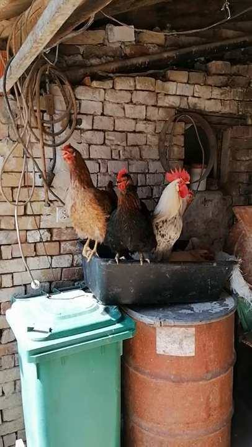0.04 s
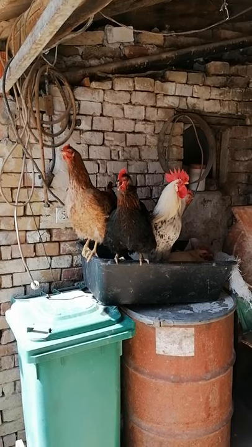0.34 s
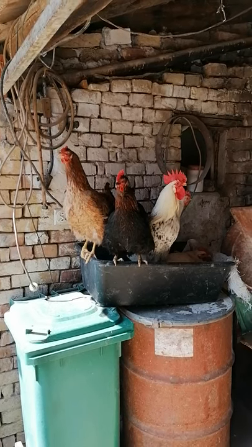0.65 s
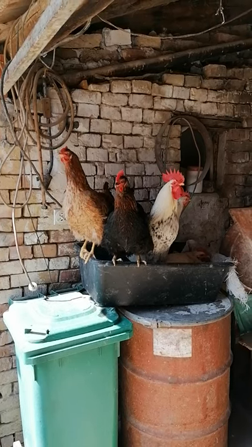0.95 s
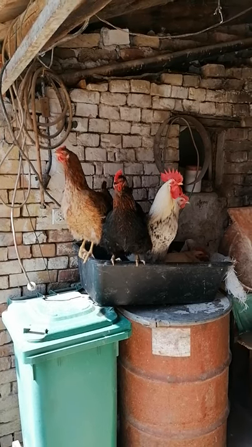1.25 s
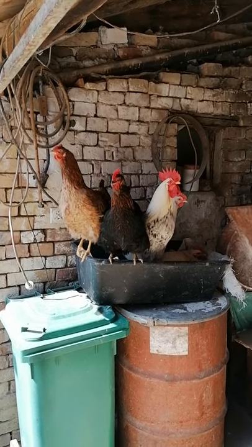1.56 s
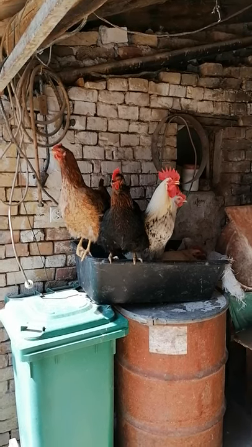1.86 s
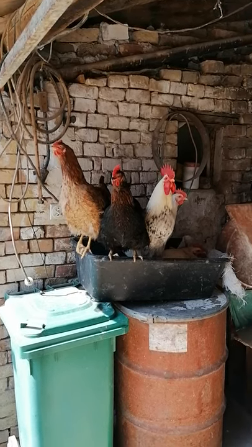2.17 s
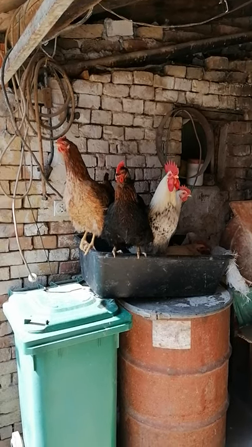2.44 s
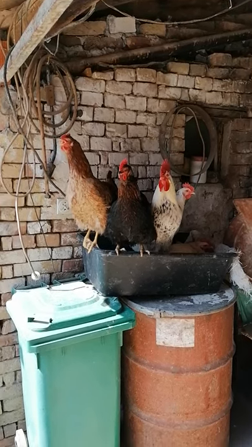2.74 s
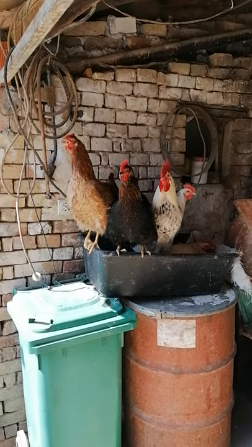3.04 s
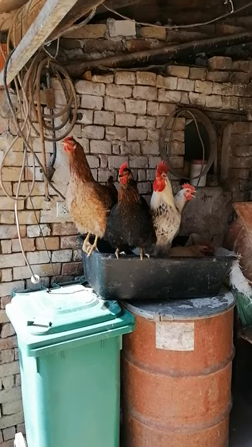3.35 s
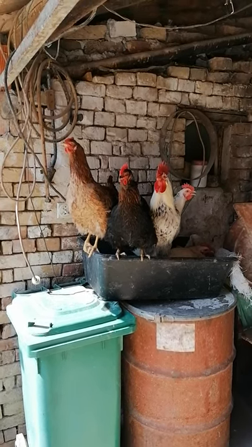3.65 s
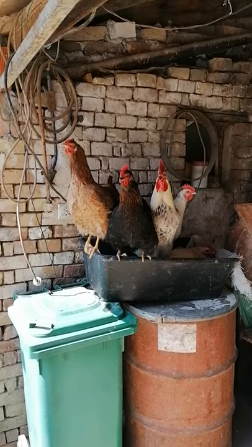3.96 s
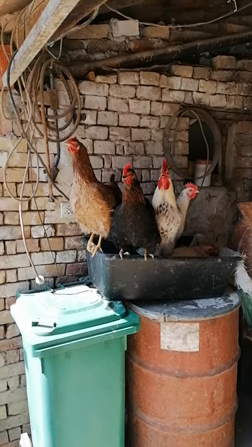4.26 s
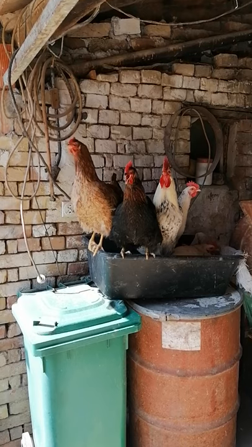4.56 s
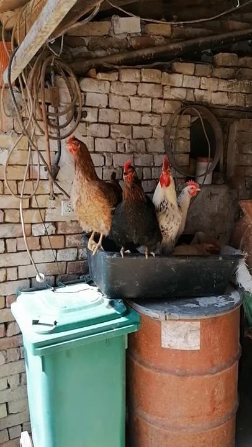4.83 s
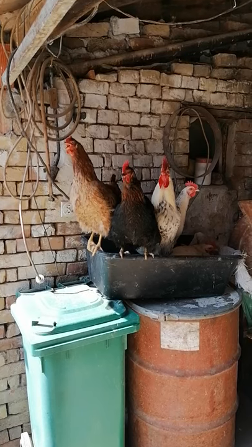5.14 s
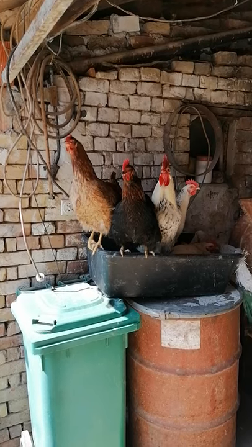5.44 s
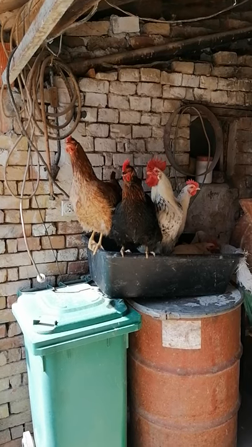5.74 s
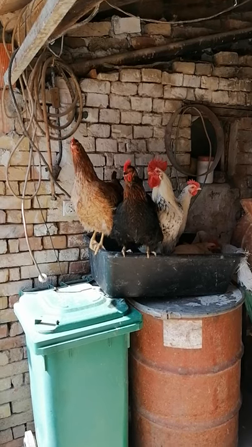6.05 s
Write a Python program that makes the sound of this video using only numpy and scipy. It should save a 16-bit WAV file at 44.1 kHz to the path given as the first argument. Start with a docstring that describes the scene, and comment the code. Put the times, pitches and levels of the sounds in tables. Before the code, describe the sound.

Several hens cackle in a brick shed, a few steps from the microphone. A shrill cry cracks, gruff clucks start up and a rasp falls away. More clucks and two soft moans lead to another cry, then two drawn-out squawks, one low and one higher. A last rasp and cry give way to clucks. The walls add a short echo over a faint yard rumble.

```python
"""Hens cackle on a tub in a brick shed, a few steps away. A shrill cry breaks, gruff clucks
start up and a rasp falls away. Clucks and two soft moans lead to another cry, then two harsh starts
clear into held tones, one low, one high. A last rasp and cry give way to clucks. Each call is a train
of syrinx pulses coloured by throat and beak; the walls answer with a short echo, over a faint yard rumble."""
import sys
import numpy as np
from scipy import signal
from scipy.fft import rfft, irfft
from scipy.io import wavfile
from scipy.ndimage import uniform_filter1d, map_coordinates

SR = 44100
rng = np.random.default_rng(int(sys.argv[2]) if len(sys.argv) > 2 else 0)


def materialize(psi):
    """Save the field psi as 16-bit PCM at rate SR to the path in sys.argv[1].

    A 1-D psi becomes a single channel; in a 2-D psi each row is a channel.
    """
    bounded = np.clip(np.atleast_2d(psi).T, -1, 1)
    quanta = np.round(bounded * 32767).astype(np.int16)
    wavfile.write(sys.argv[1], SR, quanta)


N = 269010
HZ = np.fft.rfftfreq(4096, 1 / SR)  # frequency grid of the tone curves


def amp(db):
    """Decibels to gain."""
    return 10 ** (np.asarray(db) / 20)


def evened(x):
    """Scales to rms 1."""
    return x / np.sqrt(np.mean(x ** 2) + 1e-20)


def steadied(x, size=1100):
    """Holds the short-time rms at 1."""
    return x / np.sqrt(abs(uniform_filter1d(x ** 2, size)) + 1e-12)


def ramp(t, start, length):
    """Rises from 0 to 1 over length, from start on."""
    return np.clip((t - start) / length, 0, 1)


def read(points, hz=HZ):
    """Reads a curve on a log-frequency axis."""
    f, value = np.transpose(points)
    return np.interp(np.log(hz + 1), np.log(f + 1), value)


def add(mix, s, sound):
    """Mixes a sound in at time s; what comes before time zero is dropped."""
    at = round(s * SR)
    sound = sound[max(-at, 0):]
    part = mix[max(at, 0):][:len(sound)]
    part += sound[:len(part)]


def coloured(x, db):
    """Minimum-phase EQ with the gain db on the HZ grid."""
    log_gain = np.log(amp(np.r_[db, db[-2:0:-1]]))
    taps = irfft(np.exp(np.conj(signal.hilbert(log_gain)))[:len(HZ)])
    return signal.fftconvolve(x, taps)[:len(x)]


def split(x, hz=1800):
    """Crossover into body and treble."""
    bands = [signal.butter(4, hz, kind, fs=SR, output="sos") for kind in ("low", "high")]
    return [signal.sosfilt(np.tile(sos, (2, 1)), x) for sos in bands]


def wander(n, hz):
    """Random drift of about rms 1, moving at rates up to about hz."""
    f = np.fft.rfftfreq(SR, 1 / SR)
    return evened(irfft(rfft(rng.standard_normal(SR)) / (1 + (f / hz) ** 4)))[:n]


def syrinx(hz, rough, doubling, jitter, shimmer, flutter, hiss=.5):
    """One pulse a cycle; roughness upsets pitch, timing and strength and lets puffs of air through."""
    n = len(hz)
    turns = np.cumsum(hz * (1 + flutter * rough * wander(n, 130) + .0016 * wander(n, 42))) / SR
    at = np.flatnonzero(np.diff(np.floor(turns)))
    late, strength = rng.standard_normal((len(at), 2)).T
    place = at + (np.ceil(turns[at]) - turns[at] + jitter * rough[at] * late) * SR / hz[at]
    # in period doubling every second pulse is weak
    size = np.exp(shimmer * rough[at] * strength) * (1 - doubling[at] * (np.arange(len(at)) % 2))
    near = np.floor(place).astype(int)[:, None] + np.arange(-7, 9)
    offset = near - place[:, None]
    shape = np.sinc(offset) * np.cos(np.pi * offset / 16) ** 2  # band-limited click
    pulses = np.bincount(np.clip(near, 0, n - 1).ravel(), (size[:, None] * shape).ravel(), n)
    puffs = np.exp(-(turns % 1) / .9) * rng.standard_normal(n)
    return evened(pulses - pulses.mean()) + hiss * rough * evened(puffs)


def closing_beak(drive, throat, sag, sag_s=.11, count=6):
    """The beak gapes at the start of a call and then closes, so all throat resonances slide down."""
    t = np.arange(len(drive)) / SR
    stages = np.linspace(0, t[-1], count)
    scales = 1 + sag * (np.exp(-stages / sag_s) - .4)
    return sum(np.interp(t, stages, share) * coloured(drive, read(throat, HZ / scale))
               for share, scale in zip(np.eye(count), scales))


def squawks(calls, throat, jitter, shimmer, flutter, sag, body_db, treble_db, rattle_db=4):
    """One hen's syrinx sounds through her throat, following each call's pitch, grit and level curves."""
    out = np.zeros(N)
    for start, hz, rough, doubling, effort_db, bright_db in calls:
        t = np.arange(len(hz)) / SR
        drive = syrinx(hz, np.clip(rough, 0, 1), np.clip(doubling, 0, 1), jitter, shimmer, flutter)
        body, treble = split(closing_beak(drive, throat, sag))
        voice = amp(body_db) * steadied(body) + amp(treble_db + bright_db) * steadied(treble)
        gate = ramp(t, 0, .006) * ramp(t[-1] - t, 0, .008)
        rattle = amp(rattle_db * rough * wander(len(t), 47))  # a rough voice also shakes in strength
        add(out, start, gate * rattle * amp(effort_db) * voice)
    return out


def bobbing(x, echo_db=-9, delay_s=.0021, sway_s=.00006, sway_hz=2.5):
    """The hen's head moves before a wall: the near echo shifts, and overtones swell and fade in turn."""
    at = np.arange(N)
    knots = np.arange(0, N + SR, SR / sway_hz)
    sway = uniform_filter1d(np.interp(at, knots, rng.standard_normal(len(knots))), size=8000)
    echo = map_coordinates(x, [at - (delay_s + sway_s * sway) * SR], order=3)
    return x + amp(echo_db) * split(echo)[1]


def placed(x, side, lag_samples):
    """Stereo position: the sound reaches the left first, and each side is shaded band by band."""
    side_db = read(side)
    shade_db = 10 * np.log10(np.cosh(side_db * np.log(10) / 10))  # keeps the total power constant
    delayed = np.r_[np.zeros(lag_samples), x][:N]
    return np.array([coloured(x, (side_db - shade_db) / 2), coloured(delayed, (-side_db - shade_db) / 2)])


def cry(start, length, break_s, top_hz, break_hz, break_rough, level_db, arch_db, bright_db,
        catch_s=.035, crack_s=.018, release_s=.045, sag_hz_per_s=210, fade_db_per_s=9, end_rough=.85):
    """The voice catches, clears into an arch of pitch, then breaks an octave down and frays as it sinks."""
    t = np.arange(0, length, 1 / SR)
    catch = 1 - ramp(t, 0, catch_s)
    arch = np.sin(np.pi * ramp(t, 0, break_s) ** .9).clip(0) ** .7 * (1 - catch)
    broken = ramp(t, break_s - crack_s / 2, crack_s)
    since_break = np.maximum(t - break_s, 0)
    fray = (since_break / max(length - break_s, catch_s)) ** 2
    release = ramp(t, length - release_s, release_s)
    hz = break_hz + (top_hz - break_hz) * arch - sag_hz_per_s * since_break
    rough = .03 + .65 * catch + broken * (break_rough + (end_rough - break_rough) * fray)
    doubling = .92 * np.maximum(catch / 2, broken)
    effort_db = level_db + arch_db * arch - 4 * catch ** 2 - fade_db_per_s * since_break - 9 * release
    return start, hz, rough, doubling, effort_db, bright_db


def shrill_voice():
    """Three loud breaking cries and a tiny one, through a piercing throat resonance."""
    # cries: start_s, length_s, break_s, top_hz, break_hz, break_roughness, level_db, arch_db, bright_db
    cries = [(-.11, .355, .125, 990, 915, .15, -22.5, 4, -6.5), (1.04, .1, .095, 948, 925, .1, -58, 6, -16),
             (2.858, .352, .094, 1001, 915, .48, -24, 9, -6),
             (5.088, .307, .142, 1016, 932, .25, -23, 5.8, -6.5)]
    # throat colour: frequency_hz, gain_db
    throat = [(150, -28.5), (450, -17.5), (700, -6), (950, -2.5), (1350, 5.5), (1650, -16), (2020, -6.5),
              (2450, -20.5), (2800, -7), (3400, -15.5), (5000, -19), (8000, -29), (11000, -44),
              (15000, -46.5)]
    # stereo tilt: frequency_hz, left_minus_right_db
    side = [(60, -9), (99, -28), (160, 15), (270, -3), (450, 0.5), (740, 3), (1220, -3), (2010, -1),
            (3330, -6), (5500, -6), (9080, -5.5), (15000, -5.0)]
    calls = [cry(*row) for row in cries]
    voice = squawks(calls, throat, jitter=.14, shimmer=.66, flutter=.06, sag=.041, body_db=0, treble_db=1)
    return placed(bobbing(voice), side, lag_samples=5)


def cluck_vowel(opening, peak_hz, peak_db=7, peak_octaves=.2):
    """Throat and beak as an EQ curve in dB: a broad shape, one main resonance and three narrow ones."""
    # colour with the beak shut and open: frequency_hz, gain_db
    beak_shut = [(110, -32.5), (190, -16.5), (250, -16), (350, -16.5), (560, -5), (830, 2.5), (1100, -16),
                 (1650, -21.5), (2300, -17), (3300, -24.5), (4300, -22), (5200, -33), (8500, -35.5),
                 (11500, -51.5)]
    beak_open = [(110, -24.5), (250, -16.5), (400, -31), (560, -13), (800, -6), (1100, -0.5), (1450, -7.5),
                 (2500, -23.5), (3200, -18), (4300, -22), (5000, -28.5), (8700, -31), (11000, -48),
                 (15000, -47)]
    # narrow upper resonances: shut_hz, open_hz, width_hz, gain_db
    rings = [(1296, 1363, 67, 5.5), (2030, 1930, 80, 8.5), (2520, 3260, 157, 9.5)]
    db = (1 - opening) * read(beak_shut) + opening * read(beak_open)
    db += peak_db * np.exp(-(np.log2((HZ + 1) / peak_hz) / peak_octaves) ** 2)
    for shut_hz, open_hz, width_hz, ring_db in rings:
        db += ring_db * np.exp(-((HZ - shut_hz - opening * (open_hz - shut_hz)) / width_hz) ** 2)
    return db


def clucks(gain_db=2.5, usual_db=-25, murmur_db=-30, pitch_arch=.1308):
    """Slow ragged pulses in one short push; the beak opens with the push, lifting vowel and treble."""
    # clucks: start_s, length_s, effort_db, beak_opening (0-1)
    pushes = [(.071, .047, -29, .12), (.217, .036, -28.5, .88), (.297, .044, -25.5, .8),
              (.728, .071, -28.5, .09), (.783, .057, -26, .85), (.921, .062, -22.5, .03),
              (1.14, .075, -23.5, .35), (1.466, .085, -26.5, .8), (1.692, .031, -42.5, .47),
              (1.763, .048, -24, .92), (1.964, .065, -24, .06), (2.175, .06, -22, .7),
              (2.356, .071, -24, .02), (2.473, .07, -24.5, .93), (2.598, .063, -23, .07),
              (2.75, .058, -22.3, .95), (2.811, .07, -29, .25), (3.235, .077, -26, .35),
              (3.907, .063, -25, .53), (4.488, .052, -25.5, .8), (4.523, .055, -27, .15),
              (4.958, .046, -27.5, .7), (4.997, .051, -25.5, .82), (5.487, .067, -30.5, .05),
              (5.531, .066, -24.5, .86), (5.738, .057, -25, .2), (5.825, .056, -24.5, .86),
              (6.052, .061, -29, .2)]
    # stereo tilt: frequency_hz, left_minus_right_db
    side = [(120, 3), (250, 2), (560, 3), (820, -1), (1080, 3), (1400, -12.5), (2000, -2.5), (2700, -1),
            (4000, -9), (5500, 1.5), (9000, -9), (15000, -8.5)]
    out = np.zeros(N)
    detunes = rng.uniform(.96, 1.04, len(pushes))
    for (start, length, effort_db, opening), detune in zip(pushes, detunes):
        peak_hz = 795 + 320 * opening ** 2 + 11 * (effort_db - usual_db)
        bright_db = 2.4 - 1.4 * max(murmur_db - effort_db, 0)  # a murmured cluck loses its treble
        u = np.linspace(0, 1, int(length * SR))
        push = np.sin(np.pi * u)
        # an open beak at full push gives the highest and steadiest voice
        hz = detune * (246 + 20 * opening) * (1 + pitch_arch * (push - .64))
        rough = .453 * (1.4 - 1.05 * opening * push)
        drive = syrinx(hz, rough, doubling=0 * u, jitter=.1192, shimmer=.77, flutter=.1403)
        early = coloured(drive, cluck_vowel(.32 * opening, .896 * peak_hz))
        full = coloured(drive, cluck_vowel(opening, peak_hz))
        opened = ramp(u, 0, .3)
        body, treble = split(steadied((1 - opened) * early + opened * full, size=700))
        voice = body + amp(bright_db) * 1.25 * push ** .98 * treble
        swell = (.25 + .75 * push) * signal.windows.tukey(len(u), .2)
        add(out, start, amp(effort_db + gain_db) * swell * voice)
    return placed(out, side, lag_samples=5)


def rasp(start, length, settled_hz, leap_hz, doubled, level_db, fade_db, bright_db,
         leap_at_s=.024, leap_s=.03, sag_hz_per_s=90, start_rough=.36, end_rough=.78, dulling_db=3):
    """The pitch leaps and settles; the voice doubles its period, frays and dulls as the push runs out."""
    t = np.arange(0, length, 1 / SR)
    u = t / length
    leap = np.exp(-((t - leap_at_s) / leap_s) ** 2)
    hz = settled_hz + leap_hz * leap - sag_hz_per_s * (t - length / 2)
    rough = start_rough + (end_rough - start_rough) * u ** 4
    return start, hz, rough, doubled * u, level_db - fade_db * u ** 2, bright_db - dulling_db * u ** 4


def rasping_voice():
    """Two falling rasps through a bright throat whose vowel slides well down."""
    # rasps: start_s, length_s, settled_hz, leap_hz, doubling (0-1), level_db, fade_db, bright_db
    rasps = [(.394, .239, 640, 125, .9, -18, 7, -5), (4.582, .293, 626, 70, .7, -18, 10.5, -4.8)]
    # throat colour: frequency_hz, gain_db
    throat = [(150, -52), (420, -24.5), (660, -14.5), (850, -11.5), (1300, 0), (1850, -5.5), (2300, -1),
              (2850, -5.5), (3500, 1), (4900, -16), (5700, -11.5), (9000, -21), (11000, -42), (15000, -37)]
    # stereo tilt: frequency_hz, left_minus_right_db
    side = [(60, -3), (110, 4), (200, -15), (380, -0.5), (700, 5), (1290, 1), (2380, -0.5), (4400, -5),
            (8120, -1.5), (15000, -6.5)]
    calls = [rasp(*row) for row in rasps]
    voice = squawks(calls, throat, jitter=.13, shimmer=.44, flutter=.08, sag=.14, body_db=-1, treble_db=1)
    return placed(bobbing(voice), side, lag_samples=4)


def moan(start, length, top_hz, doubled, level_db, bright_db,
         rise_s=.022, scoop_hz=60, scoop_db=7, sag_hz_per_s=200, rough=.15, fade_db=2, dulling_db=8):
    """A soft, nearly clear call that scoops up to its pitch, then sinks and dulls."""
    t = np.arange(0, length, 1 / SR)
    u = t / length
    scoop = 1 - ramp(t, 0, rise_s)
    hz = top_hz - scoop_hz * scoop - sag_hz_per_s * np.maximum(t - rise_s, 0)
    effort_db = level_db - scoop_db * scoop - fade_db * u
    return start, hz, np.full(len(t), rough), doubled * np.sqrt(u), effort_db, bright_db - dulling_db * u


def held(row, pitch, clearing_s, doubled, dip_at, dip_width, collapse_db, collapse_s=.03, dulling_db=6):
    """A harsh accent clears into a steady tone, which mellows midway and collapses into a dull rasp."""
    start, length, harsh_s, accent_db, level_db, swell_db, bright_db, dip_db = row
    t = np.arange(0, length, 1 / SR)
    onset = 1 - ramp(t, harsh_s - clearing_s, clearing_s)
    collapse = ramp(t, length - collapse_s, collapse_s)
    push_db = accent_db * onset + swell_db * (t / length) ** 2  # lifts the body of the tone only
    mellow = np.exp(-((t / length - dip_at) / dip_width) ** 2)
    hz = np.interp(start + t, *np.transpose(pitch))
    rough = .011 + .62 * (onset + collapse)
    effort_db = level_db + push_db + collapse_db * collapse
    treble_db = bright_db - push_db - dip_db * mellow - dulling_db * collapse
    return start, hz, rough, doubled * np.sqrt(onset), effort_db, treble_db


def clear_voice():
    """Two soft moans and, later, the high held tone, through one round-sounding throat."""
    # moans: start_s, length_s, top_hz, doubling (0-1), level_db, bright_db
    moans = [(1.311, .076, 527, .2, -24, -10), (2.119, .241, 560, .5, -25.3, -10.5)]
    # held tone: start_s, length_s, harsh_s, accent_db, level_db, swell_db, bright_db, treble_dip_db
    tone = (4.002, .398, .1, 1.6, -19.4, 0, -.7, 6.5)
    # its melody: time_s, pitch_hz
    pitch = [(4.05, 741.1), (4.068, 734.4), (4.102, 697.1), (4.18, 690.2), (4.28, 705.2), (4.318, 701.1),
             (4.36, 725.8), (4.375, 724.8)]
    # throat colour: frequency_hz, gain_db
    throat = [(150, -36), (450, -23), (720, 1.5), (1000, -10.5), (1420, -4.5), (2100, -11.5), (2800, -12.5),
              (4200, -11), (5000, -15.5), (7000, -24), (9000, -28.5), (11000, -49), (15000, -46)]
    # stereo tilt: frequency_hz, left_minus_right_db
    side = [(200, -5.5), (700, 1.5), (1400, -1), (2200, -1.5), (3500, -6), (4900, -3), (7000, 0),
            (14000, -11.5)]
    calls = [moan(*row) for row in moans]
    calls.append(held(tone, pitch, clearing_s=.07, doubled=.45, dip_at=.65, dip_width=.23, collapse_db=1.5))
    voice = squawks(calls, throat, jitter=.12, shimmer=.83, flutter=.07, sag=.11, body_db=-2, treble_db=.5)
    return placed(bobbing(voice), side, lag_samples=4)


def low_voice():
    """The low held tone, swelling through a throat that barely moves."""
    # held tone: start_s, length_s, harsh_s, accent_db, level_db, swell_db, bright_db, treble_dip_db
    tone = (3.375, .395, .092, 3, -22.7, 8, -1.3, 2.5)
    # its melody: time_s, pitch_hz
    pitch = [(3.455, 537.8), (3.527, 532.9), (3.663, 540.4), (3.719, 547.8), (3.75, 545.0)]
    # throat colour: frequency_hz, gain_db
    throat = [(150, -34), (540, -16.5), (800, -11), (1100, -3), (1620, -9), (2180, -9.5), (2700, -15.5),
              (3250, -12.5), (3850, -10), (4400, -21.5), (5800, -22), (8700, -23), (11000, -37.5),
              (15000, -53)]
    # stereo tilt: frequency_hz, left_minus_right_db
    side = [(200, -13), (540, -1.5), (800, 9), (1100, -4.5), (1620, -3), (2200, 1.5), (3800, -6.5),
            (6000, -3), (9000, -2.5), (14000, -5)]
    calls = [held(tone, pitch, clearing_s=.04, doubled=.2, dip_at=.53, dip_width=.15, collapse_db=-5)]
    voice = squawks(calls, throat, jitter=.1, shimmer=.49, flutter=.07, sag=.029, body_db=-.5, treble_db=1)
    return placed(bobbing(voice), side, lag_samples=2)


def shed(x, tail_db=-8, build_s=.011):
    """Direct sound, echoes off the near walls, and a short dense tail that dies sooner in the treble."""
    # reverb time: frequency_hz, t60_s
    decay_times = [(200, 0.31), (550, 0.31), (1100, 0.29), (3500, 0.21), (9000, 0.18), (15000, 0.047)]
    # wall echoes: left_delay_s, right_delay_s, level_db
    walls = [(.0029, 0.0033, -6.5), (.0056, 0.0042, -5), (.0093, .0101, -14.5), (.0147, .0138, -14),
             (.0192, 0.017, -13.5)]
    n = SR * 3 // 5
    hz, t, noise = signal.stft(rng.standard_normal((2, n)), SR, nperseg=256)
    decay = amp(-60 * t / read(decay_times, hz)[:, None]) * (1 - np.exp(-t / build_s))
    tail = signal.istft(noise * decay, SR, nperseg=256)[1][:, :n]
    response = amp(tail_db) * evened(tail) / np.sqrt(n)
    response[:, 0] += 1  # direct sound
    for left_s, right_s, db in walls:
        for side, s in zip(response, (left_s, right_s)):
            add(side, s, amp(db) * np.array([.2, .8, .2]))  # rough brick dulls the echo
    return signal.fftconvolve(x, response / np.linalg.norm(response[0]), axes=1)[:, :N]


def yard_rumble(level_db=-64.5, width=.79):
    """The faint rumble of the yard outside: dark noise, partly shared by left and right."""
    # noise colour: frequency_hz, relative_db
    colour = [(20, -1), (70, -3), (130, -6.5), (300, -10), (1000, -12), (3000, -25), (8000, -36),
              (15000, -39)]
    shared, *own = rng.standard_normal((3, N))
    spectrum = rfft(shared + width * np.array(own)) * amp(read(colour, np.fft.rfftfreq(N, 1 / SR)))
    return amp(level_db) * evened(irfft(spectrum, N))


def scene():
    """Four squawking voices and the clucks ring in the shed, over the yard's rumble."""
    hens = shrill_voice() + clucks() + rasping_voice() + clear_voice() + low_voice()
    return shed(hens) + yard_rumble()


def record(dry):
    """A steep low-pass trims the very top."""
    taps = signal.firwin(511, cutoff=15500, window=("kaiser", 9), fs=SR)
    return signal.oaconvolve(dry, taps[None], "same")


dry = scene()
out = record(dry)
materialize(out)
```